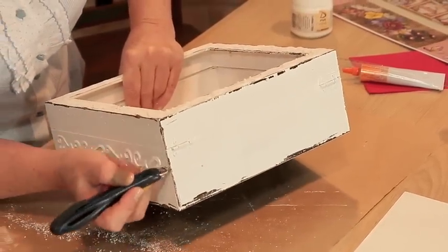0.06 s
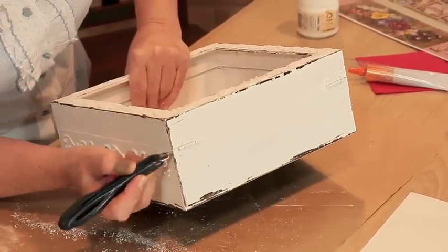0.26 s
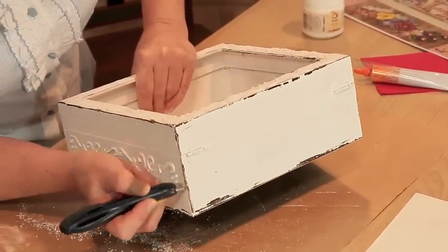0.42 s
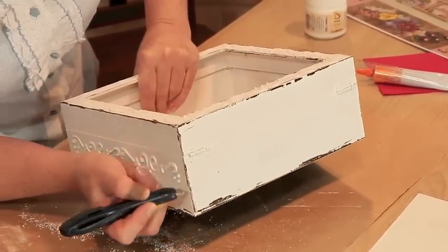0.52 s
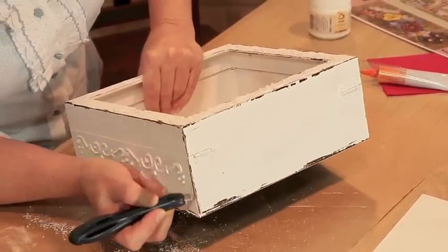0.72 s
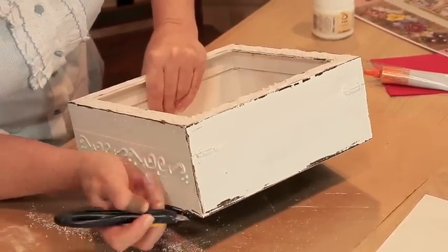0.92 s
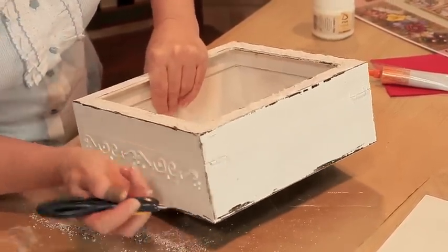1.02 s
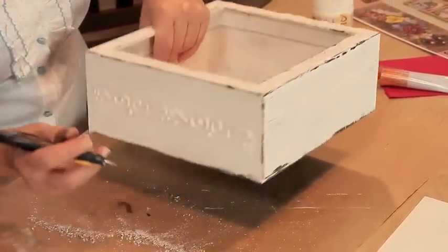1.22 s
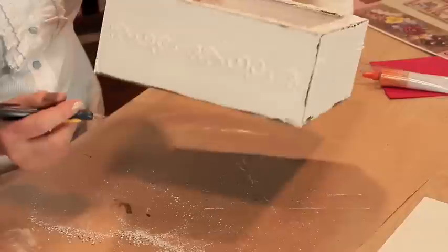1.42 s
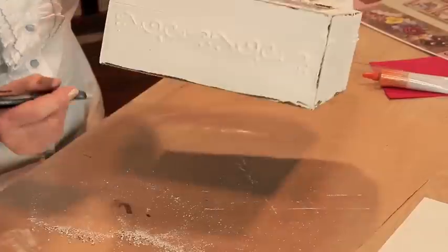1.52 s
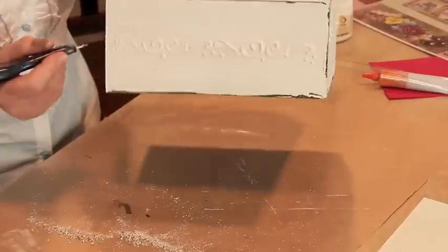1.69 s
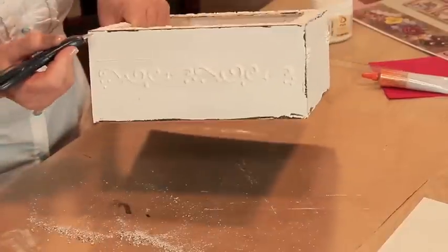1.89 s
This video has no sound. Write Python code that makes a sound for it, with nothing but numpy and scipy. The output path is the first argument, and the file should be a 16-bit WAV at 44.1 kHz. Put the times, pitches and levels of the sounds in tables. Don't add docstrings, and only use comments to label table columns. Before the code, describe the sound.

A blade scrapes paint from a hollow wooden box, heard close in a small, dull room with low hum. Gritty, clicking strokes come at about 0.05-0.2, 0.4-0.6 and, strongest, 0.8 seconds, each with a deep table rumble; a short scratch trails off near 0.95. From 1.1 cloth rustles as the box is lifted, a soft woody knock falls at 1.45, a fainter one at 1.7, then low swaying creaks.

```python
import sys
import numpy as np
from scipy import signal
from scipy.fft import rfft, irfft, next_fast_len
from scipy.io import wavfile
from scipy.ndimage import uniform_filter1d

SR = 44100
rng = np.random.default_rng(int(sys.argv[2]) if len(sys.argv) > 2 else 0)


def boost(x):
    u = np.asarray(x, float) / 20
    return 10 ** u


def file_out(sig):
    cols = np.atleast_2d(sig).T
    lim = np.clip(cols, -1, 1)
    pcm = np.round(lim * 32767).astype(np.int16)
    wavfile.write(sys.argv[1], SR, pcm)


N = 85995
T = np.arange(N) / SR


def rms_one(x):
    return x / np.sqrt(np.mean(x ** 2) + 1e-20)


def at_hz(points, hz):
    table_hz, value = np.transpose(points)
    return np.interp(np.log(np.maximum(hz, 1)), np.log(table_hz), value)


def over_time(points, **ends):
    return np.interp(T, *np.transpose(points), **ends)


def drift(rate_hz):
    r = np.exp(-2 * np.pi * rate_hz / SR)
    settled = signal.lfilter([1], [1, -2 * r, r * r], rng.standard_normal(N + SR))[SR:]
    return rms_one(settled)


def colour(x, spectrum):
    size = 4096
    cepstrum = irfft(np.log(boost(at_hz(spectrum, np.fft.rfftfreq(size, 1 / SR)))))
    cepstrum[1:size // 2] *= 2
    cepstrum[size // 2 + 1:] = 0
    return signal.fftconvolve(x, irfft(np.exp(rfft(cepstrum))))[:N]


def spread(mid, side, likeness, lean, lagged=0):
    size = next_fast_len(N + SR // 4)
    hz = np.fft.rfftfreq(size, 1 / SR)
    coherence = np.clip(at_hz(likeness, hz), -.99, .99)
    common = rfft(mid, size)
    differ = lagged * 1j * common + np.sqrt(1 - lagged ** 2) * rfft(side, size)
    ears = np.sqrt(1 + coherence) * common + np.sqrt(1 - coherence) * differ * [[1], [-1]]
    balance = boost(at_hz(lean, hz) * [[.5], [-.5]])
    return irfft(ears * balance / np.sqrt(1 + coherence.clip(0)), size)[:, :N]


# [f/Hz, level per Hz/dB]
HUM_SPECTRUM = [(25, 0), (60, 1.5), (110, -14), (200, -19), (450, -27.5), (1100, -34.5), (2000, -48),
                (16000, -52.5)]
# [f/Hz, coherence/1]
HUM_COHERENCE = [(60, -0.58), (240, 0.64), (950, 0.64), (3770, 0.44), (15000, 0.0055)]
# [t/s, level/dB]
MIC_GAIN = [(0, 7), (.2, 6.5), (.35, 3), (.6, 12.5), (.74, 2), (1.0, 8), (1.2, 2), (1.95, 0.5)]
# [t/s, level/dB]
RUSTLE_LEVEL = [(.98, -69), (1.1, -55.5), (1.2, -51), (1.33, -46), (1.47, -48), (1.56, -57.5),
                (1.75, -58.5), (1.9, -65)]
# [f/Hz, level per Hz/dB]
CLOTH_SPECTRUM = [(600, -9.5), (1050, 3.5), (1450, -2), (2200, 0), (3200, -9), (6000, -13), (8300, -9),
                  (16000, -15)]


def background():
    gain = boost(-33.5 + over_time(MIC_GAIN))
    rub = boost(over_time(RUSTLE_LEVEL, left=-99))
    twins = []
    for room_noise, cloth_noise in rng.standard_normal((2, 2, N)):
        hum = rms_one(colour(room_noise, HUM_SPECTRUM)) * gain
        rustle = rms_one(colour(cloth_noise, CLOTH_SPECTRUM)) * rub
        twins.append(hum + rustle)
    return spread(*twins, HUM_COHERENCE, [(50, 0.48), (1000, 1.7), (10000, 1.5)])


def room(x):
    t60_s, level_db, cut_hz = 0.2, -21, 1960
    t = T[:SR // 2]
    tail = rng.standard_normal((2, len(t))) * boost(-60 * t / t60_s) * (t > .008)
    tail = signal.lfilter([1], [1, -np.exp(-2 * np.pi * cut_hz / SR)], tail)
    tail = tail / np.sqrt(np.sum(tail ** 2) / 2)
    return boost(level_db) * signal.fftconvolve(x[None], tail, axes=1)[:, :N]


# [t/s, level/dB]
TABLE_LEVEL = [(0, -38), (.07, -29.5), (.118, -13.5), (0.231, -9.5), (.275, -22), (.32, -42.5),
               (.40, -24.5), (.468, -25), (.49, -11.5), (.524, -10), (0.631, -13), (.714, -35.5),
               (.79, -14), (.832, -27.5), (0.866, -9), (.95, -21), (0.985, -14.5), (1.101, -33)]
# [t/s, f/Hz]
TABLE_TUNING = [(0.0, 82.3), (0.058, 78.8), (0.318, 82.67), (0.41, 75.6), (0.542, 80.5), (0.758, 82.45),
                (0.826, 79.5), (0.974, 81.7), (1.1, 75.9)]
# [t/s, level/dB]
WOBBLE_LEVEL = [(1.05, -42), (1.12, -28.5), (1.3, -33), (1.45, -36.5), (1.8, -40.5)]
WOBBLE_BAND = [38, 70]
# [start t/s, length t/s, f/Hz, level/dB]
CREAKS = [
    (1.83, 0.14, 57, -29),
    (1.74, 0.2, 191, -44),
    (1.89, .05, 1020, -56),
    (1.455, .02, 990, -46),
]


def table():
    left_db, right_db, left_lead_rad, wander_rad = -2.5, 6, 1.82, .3
    phase = 2 * np.pi * np.cumsum(over_time(TABLE_TUNING)) / SR + wander_rad * drift(4.9)
    level = np.sqrt(2) * boost(uniform_filter1d(over_time(TABLE_LEVEL, right=-90), size=500))
    out = level * boost([[left_db], [right_db]]) * np.sin(phase + np.array([[left_lead_rad], [0]]))
    band = signal.butter(2, WOBBLE_BAND, "band", fs=SR, output="sos")
    wobble = signal.sosfilt(band, rng.standard_normal((2, N)))
    out = out + rms_one(wobble) * boost(over_time(WOBBLE_LEVEL, left=-99, right=-99))
    for start, length, hz, db in CREAKS:
        shape = np.sin(np.pi * np.clip((T - start) / length, 0, 1)) ** 0.399
        out = out + boost(db) * shape * np.sin(2 * np.pi * hz * T)
    return out


# [t/s, peak level/dB]
KNOCK_EVENTS = [
    (1.443, -26.5),
    (1.698, -39),
]
# [f/Hz, level/dB, T60/s]
KNOCK_PARTIALS = [(465, 5.5, 0.04), (515, -2, 0.04), (880, -8, 0.03), (1750, -1, 0.018), (2000, -2, 0.018)]


def knocks():
    out = np.zeros(N)
    for start, db in KNOCK_EVENTS:
        t = np.maximum(T - start, 0)
        onset = 1 - np.exp(-t / .0025)
        for hz, mode_db, t60 in KNOCK_PARTIALS:
            out += boost(db + mode_db - 60 * t / t60) * np.sin(2 * np.pi * hz * t) * onset
    return out


def resonance(hz, width):
    r = np.exp(-np.pi * width / SR)
    return np.array([[(1 - r * r) / 2, 0, (r * r - 1) / 2, 1, -2 * r * np.cos(2 * np.pi * hz / SR), r * r]])


# [f/Hz, width/Hz, level/dB]
WOOD_MODES = [(60, 20, -12), (116, 15.5, -5), (178, 30, -4), (208, 22, -3.5), (272, 27, -4), (428, 25, 2),
              (460, 40, 0), (545, 40, -3), (600, 40, -7), (777, 50, -6), (883, 67, -8), (1045, 50, 0),
              (1117, 50, -2), (1371, 80, -10)]
# [f/Hz, width/Hz, level/dB]
BLADE_MODES = [(1380, 490, 1.5), (2095, 77, -10), (3593, 270, 7), (4365, 150, 2), (5530, 530, 0.5),
               (8990, 910, -5), (12400, 3400, -13), (12480, 630, -5)]
# [f/Hz, level per Hz/dB]
RASP_SPECTRUM = [(1200, -5.5), (2600, -6), (4000, -9.5), (5400, -7), (7000, -17.5), (9500, -10),
                 (13000, -18), (16000, -25)]


def filters():
    bank = []
    for modes, gain_db in (WOOD_MODES, 35.5), (BLADE_MODES, 28):
        for hz, width, db in modes:
            bank.append((hz, db - 10 * np.log10(width) + gain_db, resonance(hz, width)))
    edges = np.geomspace(1200, 17000, num=10)
    for low, high in zip(edges, edges[1:]):
        hz = np.sqrt(low * high)
        band = signal.butter(2, [low, high], "band", fs=SR, output="sos")
        bank.append((hz, at_hz(RASP_SPECTRUM, hz) + 9.5, band))
    return bank


def slips():
    slips_per_s, spread_db, clump_db, clumps_per_s = 14000, 3, 1.1, 220
    sizes = boost(spread_db * np.minimum(rng.exponential(1, N), 4)) * rng.choice([-1, 1], N)
    happens = rng.random(N) < slips_per_s / SR
    return rms_one(sizes * happens * boost(clump_db * drift(clumps_per_s)))


# [t/s, edge rasp level/dB, box weight re rasp/dB]
STROKE_SECTIONS = [
    [(.045, -42, 13), (.055, -44, -26), (.075, -46.5, 2), (.085, -38.5, 15), (.11, -37.5, 12),
     (.14, -25.5, 3.5), (.168, -34.5, 13.5), (.18, -41, 4), (.26, -69.5, 25.5)],
    [(.39, -38, -32), (.41, -50, 17.5), (.418, -33, 6.5), (.466, -23, 2), (.50, -29.5, 11), (.53, -35, 12),
     (.55, -42.5, 15.5), (.565, -46, 2)],
    [(.565, -59, 24), (.577, -34, 10), (.593, -38.5, 12), (.615, -42, -22), (.63, -51, -4),
     (.679, -51.5, -9), (.7, -81, -13)],
    [(.765, -33.5, 15), (.77, -36.5, -8), (.776, -27.5, 0.5), (.817, -15, -1), (.833, -26.5, 8.5),
     (.863, -29, 0.5), (.881, -43, 3.5), (.93, -58, 25)],
    [(.935, -75, 12), (.941, -36, 8.5), (.958, -38, -28), (.985, -58.5, 8), (1.027, -61, 5),
     (1.055, -61.5, 12.5), (1.107, -50, -5), (1.12, -67, 1)],
]
# [t/s, peak level/dB, box share/dB, brightest f/Hz]
CATCHES = [(0.0397, -16.5, -1.5, 6260), (0.0835, -16, -20, 6100), (0.1052, -24.5, 3, 6100),
           (0.1168, -10.5, 1, 5700), (0.139, -32, -17, 6000), (0.1432, -19, 6.5, 9000),
           (0.163, -20.5, 1, 5800), (0.166, -18.5, -4, 5600), (0.2738, -32.5, -1, 4850),
           (0.279, -34, -8, 4700), (0.3232, -33, -11, 8300), (0.3849, -17.5, -1.5, 7500),
           (0.4208, -33, 1, 10900), (0.426, -14, 7, 9500), (0.4526, -18, 10.5, 6030),
           (0.466, -18, -10, 5000), (0.469, -26, -15, 12800), (0.5132, -26, 5.5, 4500),
           (0.576, -37, 7, 2700), (0.759, -15, 2.5, 5600), (0.7743, -14, 1, 5400), (0.7838, -11, -18, 5346),
           (0.788, -9, -26, 5170), (0.804, -17, -24, 3500), (0.8134, -29, -11, 4480),
           (0.826, -31, -26, 11000), (0.8588, -14.5, -18, 7040), (0.615, -27, -2, 4030),
           (0.9427, -25, -10, 2700), (0.95, -16, -17, 4600), (0.958, -19, -16, 4340),
           (1.0178, -35, -15, 5000), (1.028, -29.5, -1, 4500), (1.124, -44, -2, 5450),
           (1.273, -35, -7, 9800)]
# [f/Hz, level/dB]
CATCH_TILT = [(250, 10), (450, 3.5), (1100, -16), (3000, -4.5), (8000, -4.5), (16000, 2)]


def scrape():
    wood_hz, steel_hz = 944, 3540
    patch_db, patches_per_s = 2.6, 60
    catch_t60_s, catch_gain_db, scatter_db = 0.013, -2.5, 2.5
    peak_gain_db, peak_octaves = 7.5, 0.26
    edge_db, weight_db = np.full(N, -120.), np.zeros(N)
    for rows in STROKE_SECTIONS:
        s, db, rel_db = np.transpose(rows)
        on = (T >= s[0]) & (T < s[-1])
        edge_db[on] = np.interp(T[on], s, db)
        weight_db[on] = np.interp(T[on], s, rel_db)
    force, bank, out = np.array([slips(), slips()]), filters(), 0
    length = SR // 30
    bursts = rng.standard_normal((len(CATCHES), 2, length))
    luck = rng.standard_normal((len(CATCHES), len(bank)))
    fade = boost(catch_gain_db - 60 * T[:length] / catch_t60_s)
    for k, (hz, gain_db, sos) in enumerate(bank):
        wood = np.clip(np.log(steel_hz / hz) / np.log(steel_hz / wood_hz), 0, 1)
        drive = force * boost(edge_db + wood * weight_db + patch_db * drift(patches_per_s))
        for (start, db, box_db, peak_hz), burst, chance in zip(CATCHES, bursts, luck[:, k]):
            i = int(start * SR)
            near = np.exp(-(np.log2(hz / peak_hz) / peak_octaves) ** 2)
            level_db = db + wood * box_db + at_hz(CATCH_TILT, hz) + scatter_db * chance + peak_gain_db * near
            drive[:, i:i + length] += burst * fade * boost(level_db)
        out = out + (-1) ** k * boost(gain_db) * signal.sosfilt(sos, drive + 1e-18)
    return out


# [f/Hz, coherence/1]
BOX_COHERENCE = [(60, .0), (130, -.5), (290, .7), (640, .93), (1400, .92), (3100, .8), (6800, .35),
                 (15000, .3)]
# [f/Hz, level/dB]
BOX_BALANCE = [(60, -5), (130, -3), (250, 1), (600, 0), (1200, -3), (4000, -3), (8000, -1.5), (13000, -5)]


def scene():
    box, twin = scrape()
    direct = spread(box + knocks(), twin, BOX_COHERENCE, BOX_BALANCE, lagged=.65)
    return direct + room(box) + table() + background()


def low_pass(x):
    return signal.sosfilt(signal.butter(12, 16850, fs=SR, output="sos"), x)


def record(dry):
    x = signal.sosfilt(signal.butter(3, [33, 14000], "band", fs=SR, output="sos"), dry)
    x = x / (1 + (x / .9) ** 6) ** (1 / 6)
    x = signal.sosfilt(signal.cheby2(12, 60, 16700, fs=SR, output="sos"), x)
    return low_pass(x)


dry = scene()
out = record(dry)
file_out(out)
```